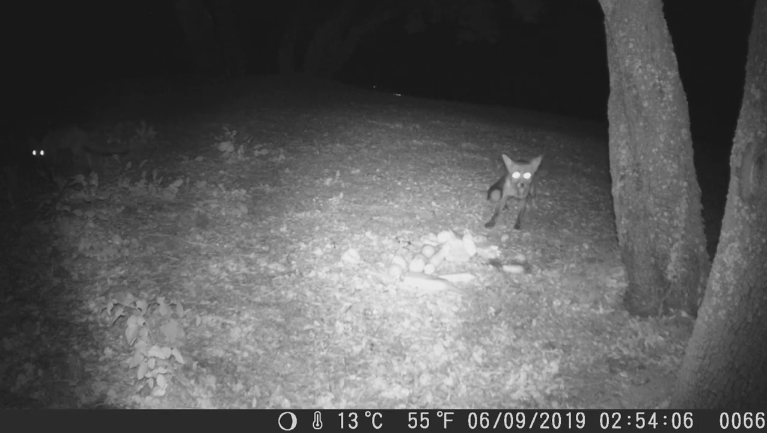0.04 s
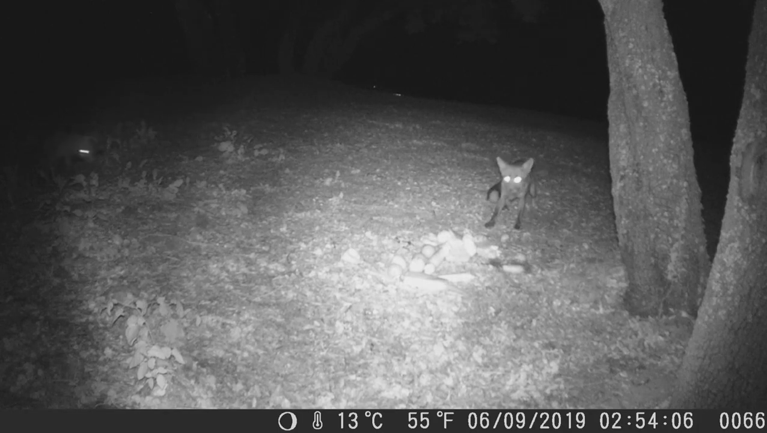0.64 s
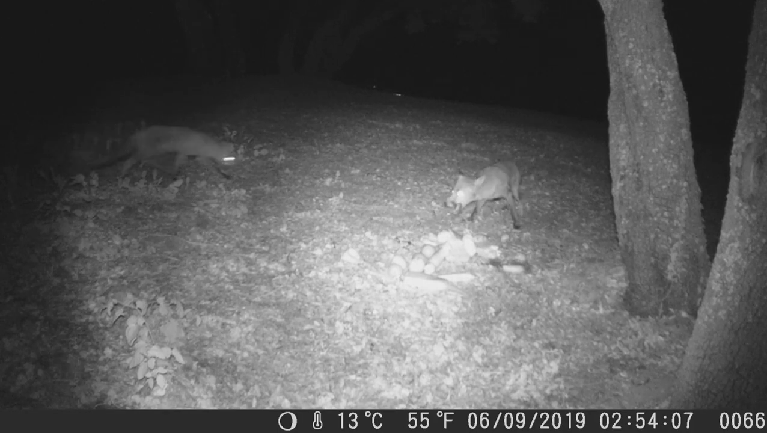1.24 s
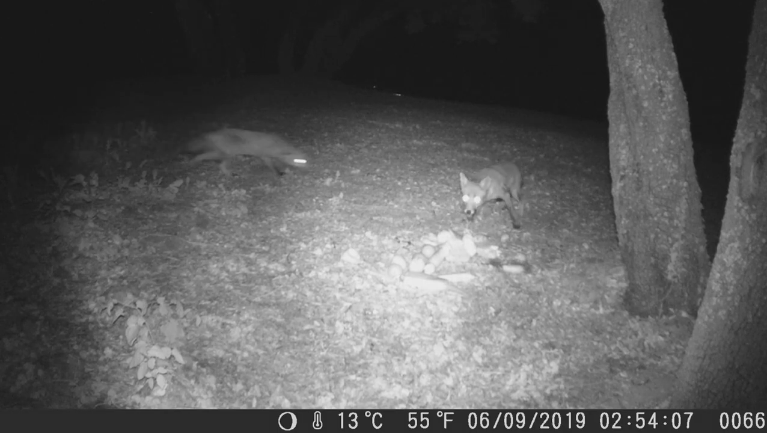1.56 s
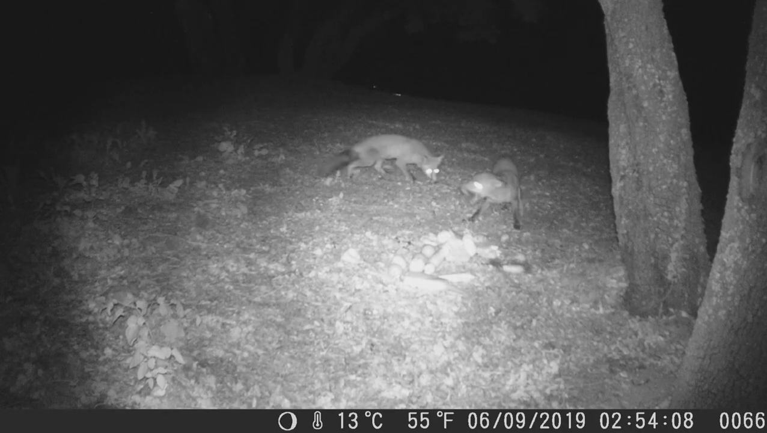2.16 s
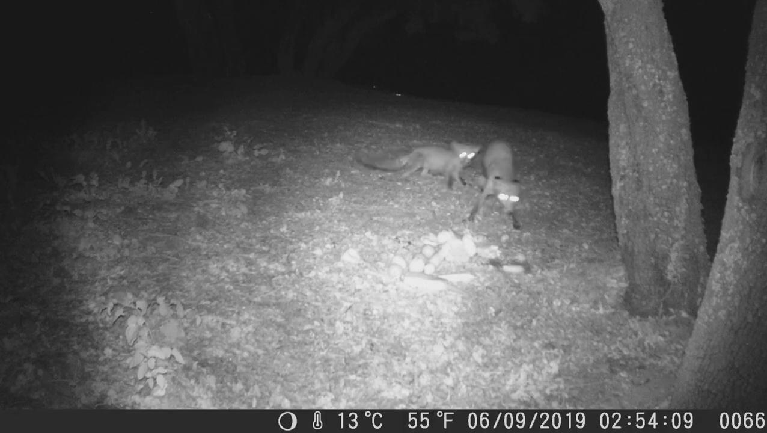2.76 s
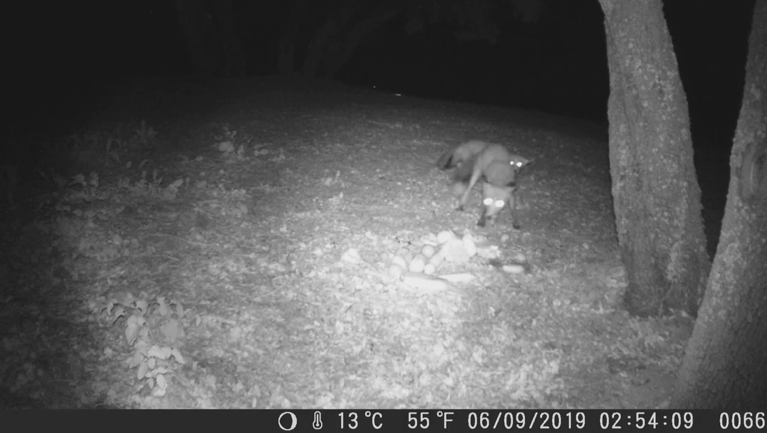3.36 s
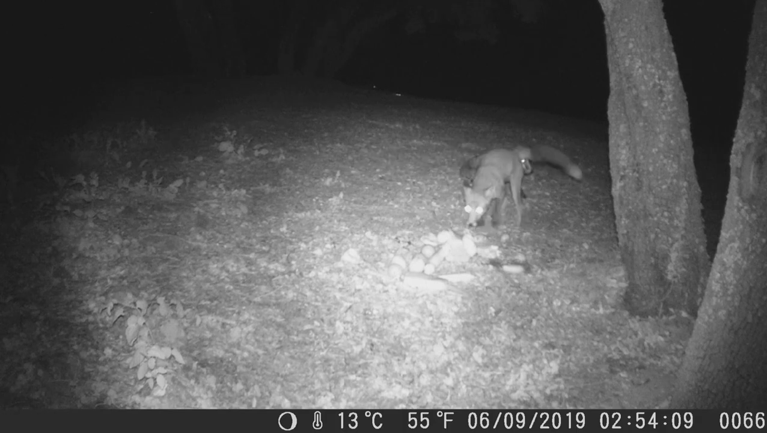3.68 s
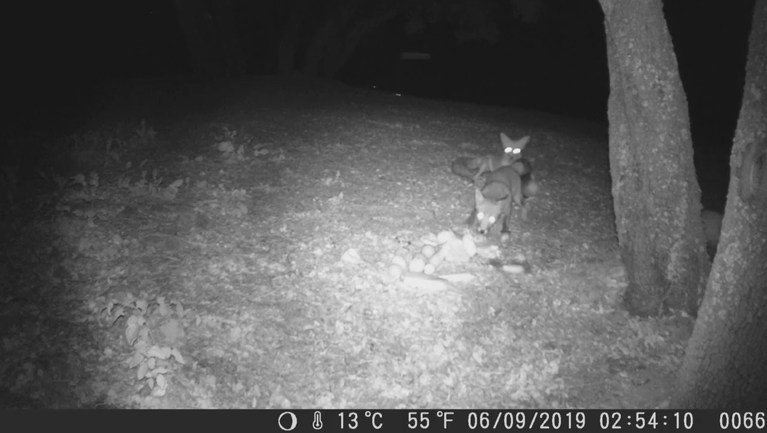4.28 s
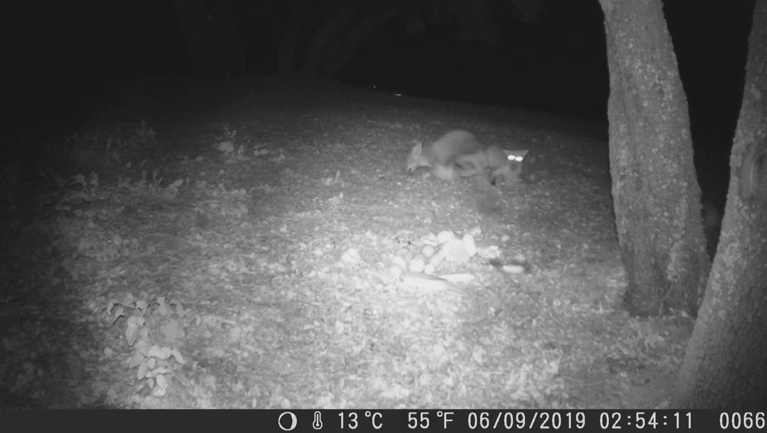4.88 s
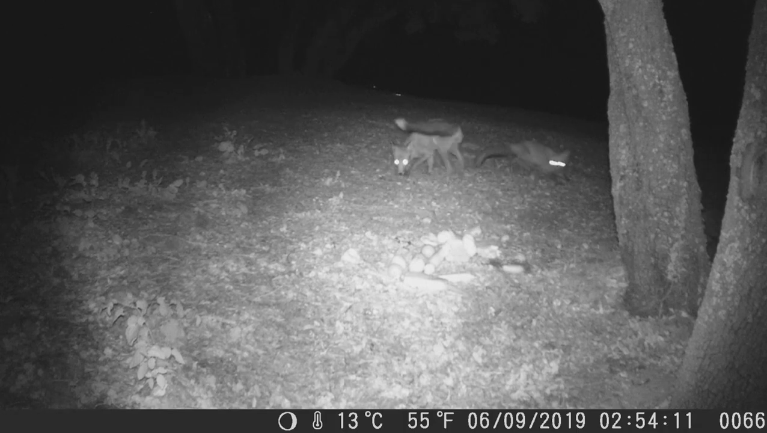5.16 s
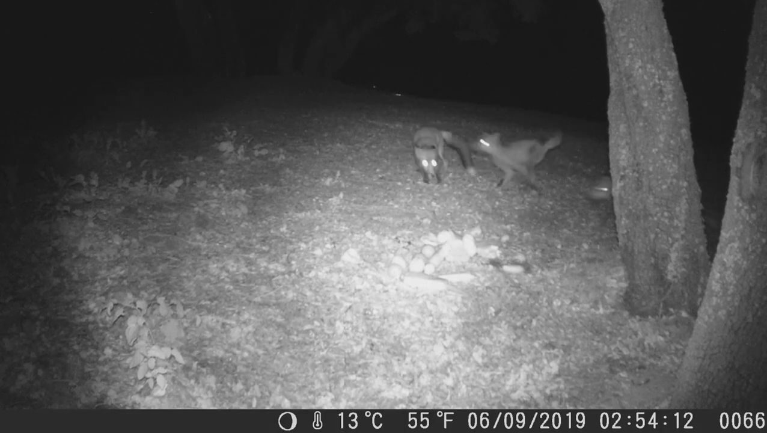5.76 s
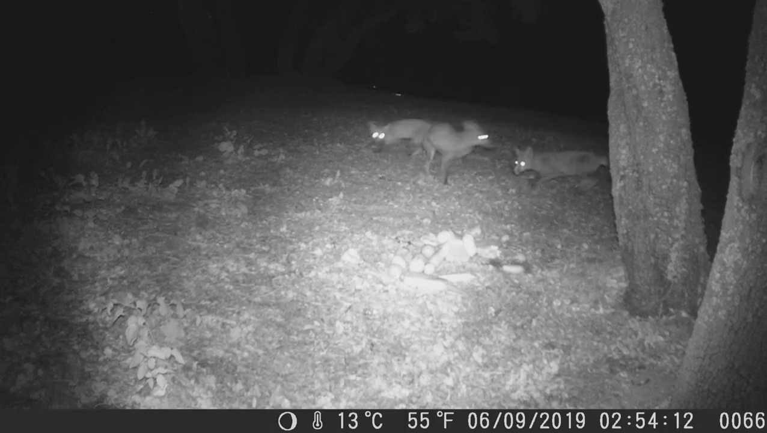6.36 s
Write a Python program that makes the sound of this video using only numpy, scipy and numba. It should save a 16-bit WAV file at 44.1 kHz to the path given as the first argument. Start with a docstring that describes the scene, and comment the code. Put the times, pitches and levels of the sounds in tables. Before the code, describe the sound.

Foxes squabble outdoors at night with short raspy cries, whines and yips over a steady low rumble and hiss.

```python
"""Foxes squabble on a lawn at night, a few metres from a trail camera.
Regular vibration of their vocal folds gives wavering whines, yips and a squeal; chaotic vibration
gives harsh rasps. Two dry clacks come first, and trees echo it all faintly.
Low buffets, thumps and a brief hum pass over the rumble and hiss of the night. The camera's housing
colours the cries and clacks; its electronics add a 25 Hz throb and a glassy mirrored treble."""
import sys
import numpy as np
from scipy import signal
from scipy.fft import rfft, irfft
from scipy.io import wavfile
from scipy.ndimage import uniform_filter1d
from numba import njit

SR = 44100
rng = np.random.default_rng(int(sys.argv[2]) if len(sys.argv) > 2 else 0)


def master(y):
    """Save y as 16-bit WAV."""
    cut = np.clip(np.atleast_2d(y).T, -1, 1)
    pcm = np.round(cut * 32767)  # scale
    wavfile.write(sys.argv[1], SR, pcm.astype(np.int16))


N = 291942
TIME = np.arange(N) / SR
FREQS = np.fft.rfftfreq(N, 1 / SR)


def undb(db):
    """Amplitude ratio of a level in decibels."""
    return 10 ** (np.asarray(db) / 20)


def unit(x):
    """Normalisation to an rms of 1."""
    return x / np.sqrt(np.mean(x ** 2))


def steady(x, size):
    """Division by the running rms over size samples levels the power and keeps the faster grain."""
    return x / np.sqrt(np.abs(uniform_filter1d(x ** 2, size=size)) + 1e-12)


def shape(x, gain):
    """Filtering as multiplication of the spectrum by a gain."""
    return irfft(rfft(x) * gain, N)


def below(hz, order=4):
    """Magnitude response of a maximally flat low-pass."""
    return 1 / np.sqrt(1 + (FREQS / hz) ** (2 * order))


def above(hz, order=4):
    """Magnitude response of the power-complementary high-pass."""
    return np.sqrt(1 - below(hz, order=order) ** 2)


def waver(hz):
    """Random modulation: noise low-passed at hz, with an rms of 1."""
    return unit(shape(rng.standard_normal(N), below(hz, order=3)))


@njit
def resonate(x, hz, width):
    """A second-order resonator whose centre frequency may move every sample."""
    y, band_state, low_state = np.empty(len(x)), 0., 0.
    for i in range(len(x)):
        tuning, damping = np.tan(np.pi * hz[i] / SR), width / hz[i]
        band = (band_state + tuning * (x[i] - low_state)) / (1 + tuning * (tuning + damping))
        band_state = 2 * band - band_state
        low_state += 2 * tuning * band
        y[i] = damping * band
    return y


def note(start, length, attack, release):
    """Time window of a sound: its samples, its progress from 0 to 1 and its amplitude envelope."""
    span = (TIME >= start) & (TIME <= start + length)
    age = TIME[span] - start
    ramp = lambda x: np.sin(np.pi / 2 * np.clip(x, 0, 1))
    return span, age / length, ramp(age / attack) * ramp((length - age) / release)


def arc(u, first, middle, last):
    """Parabolic interpolation through three values as u goes from 0 to 1."""
    return first + (last - first) * u + (middle - (first + last) / 2) * (1 - (2 * u - 1) ** 2)


def night(level_db=-53, swell_db=1.6):
    """Coloured noise: a smooth hiss over a rumble under slow amplitude modulation."""
    # Each row: frequency in Hz, relative spectral density in dB.
    spectrum = [(8, 8), (30, 1), (55, -7.5), (120, -10), (200, -16.5), (320, -24.5), (600, -31),
                (1400, -35), (2600, -42), (3300, -46), (5200, -52), (7800, -48.5), (11000, -59),
                (15500, -60.5)]
    hz, db = np.transpose(spectrum)
    colour = undb(np.interp(np.log(FREQS + 1), np.log(hz), db))
    noise = unit(shape(rng.standard_normal(N), colour)) * undb(level_db)
    rumble = shape(noise, below(370))
    return noise + rumble * (undb(swell_db * waver(0.72)) - 1)


def throb(rate_hz=25.002, first_s=0.0338, db=-53.5, width_s=0.003, uneven=0.18):
    """A periodic pulse train: the camera's electronics dip once for every picture taken."""
    offset_s = (((TIME - first_s) * rate_hz + .5) % 1 - .5) / rate_hz
    dips = -np.exp(-.5 * (offset_s / width_s) ** 2) * (1 + uneven * waver(5.6))
    return unit(dips - dips.mean()) * undb(db)


def mirrored(x, hold_hz=16000, second_hz=12000, second_db=-7):
    """Spectral imaging: coarse sample clocks mirror the sound about their rates, high notes most."""
    slope = np.gradient(shape(x, below(8060, order=6))) * SR / np.pi
    clock = lambda hz: np.sin(2 * np.pi * hz * TIME) / hz
    return x + slope * (clock(hold_hz) + undb(second_db) * clock(second_hz))


def buffets(width_hz=120, dull_hz=260):
    """Narrow-band noise under smooth envelopes is heard as soft low rushes."""
    # Each row: start, length, attack and release in seconds, level in dB before dulling, centre in Hz.
    rushes = [(0.218, 0.66, 0.45, 0.42, -55, 178), (1.77, .1, 0.053, 0.048, -53.5, 186),
              (3.255, 0.11, 0.039, 0.075, -50.5, 184.9), (5.819, 0.288, 0.096, 0.076, -48, 163),
              (6.063, 0.26, 0.11, .06, -61.5, 133)]
    noise, out = rng.standard_normal(N), np.zeros(N)
    for start, length, attack, release, db, hz in rushes:
        span, _, envelope = note(start, length, attack, release)
        band = steady(resonate(noise, np.full(N, float(hz)), width_hz), size=1200)
        out[span] += envelope * undb(db) * band[span]
    return shape(out, below(dull_hz, order=3) * above(59, order=3))


def hum(jitter=0.031):
    """Low gliding tones waver by random frequency modulation during the two longest buffets."""
    # Each row: start, length, attack and release in seconds, level in dB,
    # first, middle and last pitch in Hz.
    strains = [(.32, 0.325, 0.17, 0.32, -50, 154, 147, 159), (.6, 0.086, 0.033, 0.015, -55, 147, 187, 177),
               (.49, 0.13, 0.049, 0.15, -69, 370, 428, 410),
               (.635, 0.291, 0.016, 0.28, -52, 111.5, 133, 156),
               (5.86, 0.246, 0.018, 0.035, -52.5, 139.2, 142, 132)]
    drift, out = 1 + jitter * waver(27), np.zeros(N)
    for start, length, attack, release, db, *pitch in strains:
        span, progress, envelope = note(start, length, attack, release)
        phase = 2 * np.pi * np.cumsum(arc(progress, *pitch) * drift[span]) / SR
        out[span] += envelope * undb(db) * unit(np.sin(phase))
    return out


def thumps():
    """Wave packets: a few low cycles under a bell-shaped envelope make a dull bump with no click."""
    # Each row: peak time in seconds, peak level in dB, pitch in Hz, half length in seconds.
    packets = [(1.784, -42, 188, 0.006), (1.802, -35, 151, 0.0032), (1.815, -39, 129, 0.0068),
               (2.138, -42.5, 169, 0.0051), (3.31, -32.5, 123.5, 0.0063), (3.341, -43.5, 160, .004)]
    out = np.zeros(N)
    for peak_s, db, hz, half_length in packets:
        envelope = np.exp(-((TIME - peak_s) / half_length) ** 2)
        out += undb(db) * envelope * np.sin(2 * np.pi * (hz * (TIME - peak_s) + rng.random()))
    return out


def trees(x, wash_t60=0.41, wash_db=-23, near_t60=0.27, near_db=-15, echo_s=0.26, echo_db=-35):
    """Reverberation: quick scatter from ground and trunks, a dull thin wash and one far echo."""
    def tail(t60):
        return unit(rng.standard_normal(N) * undb(-60 * TIME / t60)) / np.sqrt(N)
    wash = undb(wash_db) * tail(wash_t60)
    echo = undb(echo_db) * np.roll(tail(0.186), int(echo_s * SR))
    response = shape(wash + echo, below(2600, order=3)) + undb(near_db) * tail(near_t60)
    return signal.fftconvolve(x, response[:SR])[:N]


def housing_colour(hz):
    """Gain at hz of the camera housing's fixed narrow resonances, which colour every cry and clack."""
    # Each row: centre in Hz, nominal width in Hz, relative peak gain in dB.
    resonances = [(816, 320, -11.5), (1080, 232, 15), (1422, 304, 9), (1819, 117, 3), (2319, 129, 0),
                  (2598, 340, -5), (3432, 190, -15), (4175, 590, -22.5), (5300, 1320, -24.5),
                  (6600, 1600, -28.5)]
    return np.sqrt(sum(undb(db) ** 2 / (1 + (1.3 * (hz - centre) / width) ** 2) ** 3
                       for centre, width, db in resonances))


def clacks(width_hz=650, lift_db=2, attack_s=0.0015):
    """Exponential decay: two dry bursts of noise, coloured by the housing, ring and die at once."""
    # Each row: time in seconds, level in dB before the lift, resonance in Hz, decay time in seconds.
    bursts = [(0.658, -56, 1900, 0.0067), (0.688, -55, 1700, 0.004)]
    out = np.zeros(N)
    for start, db, hz, decay in bursts:
        noise = shape(rng.standard_normal(N), housing_colour(FREQS))
        ring = steady(resonate(noise, np.full(N, float(hz)), width_hz), size=300)
        onset = np.sin(np.pi / 2 * np.clip((TIME - start) / attack_s + .5, 0, 1)) ** 2
        out += ring * undb(db + lift_db) * onset * np.exp(-np.maximum(TIME - start, 0) / decay)
    return out


def jaws(harsh_db_per_octave=27.5):
    """A variable cavity: as the jaws close, the mouth resonance sinks and a rasp's harsh top fades."""
    # Each row: start, length, attack and release in seconds, first and last body level in dB,
    # level of the top at the widest opening in dB, first, middle and last mouth resonance in Hz.
    gestures = [ (1.641, 0.068, 0.0089, .045, -49, -59.5, -66, 1360, 1300, 1142),
                (1.676, .165, 0.044, .02, -54, -49, -62.5, 990, 1370, 1300),
                (2.33, 0.069, 0.014, 0.035, -61.5, -64, -54, 1300, 1470, 1888),
                (2.425, 0.1, 0.025, .02, -69, -58, -52.5, 1860, 1790, 1662),
                (2.504, .097, 0.028, .015, -45, -43.5, -39, 1480, 1650, 1758),
                (2.586, 0.083, 0.013, .045, -41.5, -45.5, -43, 1910, 1560, 1183),
                (3.187, .185, .018, .055, -49.5, -51, -62.5, 1166, 1360, 1181),
                (3.329, 0.11, 0.061, 0.021, -48.5, -48, -63, 1210, 1140, 1080),
                (3.917, 0.12, 0.0073, 0.032, -55, -48.5, -51, 1510, 1650, 1438),
                (4.013, 0.1, 0.02, 0.049, -44.5, -51.5, -59, 1350, 1260, 1191),
                (4.117, .034, 0.005, 0.032, -54, -52.5, -66.5, 1290, 1170, 1146),
                (5.468, 0.035, 0.0048, 0.01, -55.5, -52.5, -56, 1460, 1330, 1080),
                (5.646, 0.11, .03, 0.061, -74, -71.5, -77, 1300, 1520, 1298),
                (5.669, .014, .003, .009, -65.5, -61.5, -66.5, 1450, 1400, 1420),
                (5.848, 0.07, 0.036, 0.025, -53.5, -62, -71, 1280, 1070, 1121),
                (5.9, .2, 0.021, 0.078, -63.5, -71.5, -73.5, 1300, 980, 1247)]
    body_power, top_power, weighted_hz = np.full(N, 1e-14), np.full(N, 1e-14), np.full(N, 1e-11)
    for start, length, attack, release, first_db, last_db, harsh_db, *mouth in gestures:
        span, progress, envelope = note(start, length, attack, release)
        hz = arc(progress, *mouth)
        power = (envelope * undb(first_db + (last_db - first_db) * progress)) ** 2
        body_power[span] += power
        weighted_hz[span] += power * hz
        top_db = harsh_db + harsh_db_per_octave * np.log2(hz / hz.max())
        top_power[span] += (envelope * undb(top_db)) ** 2
    return weighted_hz / body_power, 10 * np.log10(body_power), 10 * np.log10(top_power)


def rasps(mouth_width_hz=660, split_hz=2080, shrill_hz=3350., shrill_width_hz=500, gust_hz=850):
    """Chaotic vocal folds: uneven pulses and puffs of air excite the mouth and housing resonances."""
    mouth_hz, body_db, harsh_db = jaws()
    # the folds flap at half the mouth resonance, most wildly in a scream and as the voice gives out
    chaos = np.interp(harsh_db, [-84, -76, -52, -44], [1, 0, 0, 1])
    scream = np.interp(harsh_db, [-53, -46], [0, 1])
    jitter, air = .055 + .07 * chaos, .55 + .7 * chaos
    rattle = undb(2.7 * waver(330))
    cycles = np.cumsum(mouth_hz / 2 * (1 + jitter * waver(300))) / SR
    pulses = unit(np.diff(np.floor(cycles), prepend=0))
    puffs = unit(rng.standard_normal(N) * np.exp(-(cycles % 1) / 1.4))
    source = shape((pulses + air * puffs) * rattle, housing_colour(FREQS))
    body = resonate(shape(source, below(split_hz, order=8)), mouth_hz, mouth_width_hz)
    # a scream thins out at the low end
    body -= scream * shape(body, below(1050, order=5))
    top = shape(source, above(split_hz, order=12))
    # wide-open jaws add a shrill ring
    top += 2.1 * scream * resonate(top, np.full(N, shrill_hz), shrill_width_hz)
    # a dull gust of air goes with every rasp, less so with a tight scream
    gust = unit(shape(rng.standard_normal(N), below(gust_hz, order=6) * above(230)))
    gust *= undb(-24) * (1 - 0.28 * scream)
    return (steady(body, size=1300) + gust) * undb(body_db) + steady(top, size=1300) * undb(harsh_db)


def cries(whine_release_s=0.006, whine_db_per_octave=10.5):
    """Pitch and amplitude contours: each clear cry as samples, pitch, effort, brightness and jitter."""
    # Each row is one whine (the fourth a squeal), in points of time in seconds and pitch in Hz.
    contours = [
        [(1.352, 726), (1.386, 835), (1.406, 613), (1.42, 587), (1.458, 681), (1.476, 617.0), (1.496, 666),
         (1.552, 671), (1.586, 612.2), (1.648, 746)],
        [(2.112, 557), (2.174, 577), (2.192, 653), (2.242, 726)],
        [(2.238, 760.5), (2.246, 845), (2.258, 893), (2.28, 819), (2.332, 1050), (2.34, 1130)],
        [(2.372, 2028), (2.404, 1956), (2.454, 2160), (2.508, 2122), (2.515, 2086)],
        [(3.058, 830), (3.088, 620.7), (3.146, 684.3), (3.172, 666), (3.188, 563), (3.198, 606.7)],
        [(3.797, 743.4), (3.835, 959), (3.853, 834), (3.871, 819), (3.893, 970), (3.924, 1114)],
    ]
    # Each row: attack in seconds, first and last level at the mean pitch in dB,
    # first and last brightness in dB per octave, jitter as a share of the pitch.
    dynamics = [(0.032, -62, -57, 8, 2.5, 0.0097), (.02, -65, -72, -3, -6, .007),
                (.012, -58, -54.5, 17, 16, .007), (.006, -55.5, -41.5, 23, -5, 0.0073),
                (0.032, -58.5, -55, 1, 1.5, 0.0082), (0.025, -64, -55.5, 14, 11.5, 0.0056)]
    # Each row: start, length, attack and release in seconds, level in dB, brightness in dB per octave,
    # jitter as a share of the pitch, first, middle and last pitch in Hz.
    yips = [ (1.827, 0.036, 0.01, 0.027, -55, -6, 0.017, 1120, 1010, 980),
            (2.338, 0.039, .005, 0.0053, -49.5, 14.5, 0.036, 1520, 1700, 1920),
            (2.592, 0.028, 0.0054, 0.0064, -34.5, -21, .012, 1900, 1770, 1630),
            (2.619, 0.017, .008, 0.0089, -32.5, -2, .012, 1495, 1480, 1420),
            (2.642, .033, 0.011, 0.0089, -56.5, -4, 0.022, 1100, 980, 960),
            (4.399, 0.059, 0.039, 0.028, -63.5, -1, 0.027, 1200, 1070, 980),
            (5.414, 0.025, 0.008, 0.014, -49.5, 9.5, 0.011, 1400, 1430, 1510),
            (5.431, .052, 0.0049, 0.017, -57.5, 13.5, 0.018, 1510, 1585, 1530),
            (5.817, 0.038, .018, 0.0059, -62.5, 7, .015, 1050, 830, 994),
            (5.853, 0.055, .01, 0.04, -47.5, 0, .012, 1440, 1390, 1287)]
    for contour, (attack, first_db, last_db, first_tilt, last_tilt, jitter) in zip(contours, dynamics):
        times, pitch = np.transpose(contour)
        span, progress, envelope = note(times[0], times[-1] - times[0], attack, whine_release_s)
        hz = uniform_filter1d(np.interp(TIME[span], times, pitch), size=300)
        db = first_db + (last_db - first_db) * progress + whine_db_per_octave * np.log2(hz / hz.mean())
        yield span, hz, envelope * undb(db), first_tilt + (last_tilt - first_tilt) * progress, jitter
    for start, length, attack, release, db, tilt, jitter, *pitch in yips:
        span, progress, envelope = note(start, length, attack, release)
        yield span, arc(progress, *pitch), envelope * undb(db), tilt, jitter


def whines_and_yips(shimmer=0.25, air_db=-19, air_db_per_octave=3, ring_db=6, edge_hz=4600):
    """Periodic vocal folds: harmonics slide through the housing's resonances, with a little air."""
    voice, leak = np.zeros(N), np.zeros(N)
    wobble, flutter = waver(170), waver(75)
    harmonic = np.arange(1, 13)[:, None]
    for span, pitch, effort, tilt, jitter in cries():
        hz = pitch * (1 + jitter * wobble[span])
        phase = 2 * np.pi * np.cumsum(hz) / SR
        # brightness tilts the overtones, but the folds close too softly to sound far above the edge
        octaves = np.log2(np.minimum(np.minimum(harmonic, 3.2), 4300 / hz))
        weights = housing_colour(harmonic * hz) * undb(tilt * octaves)
        weights *= undb(np.interp(harmonic * hz / edge_hz, [1, 1.3], [0, -17]))
        # low, pinched whines have a thin ring in their fifth and sixth harmonics
        weights *= undb(ring_db * np.isin(harmonic, (5, 6)) * np.interp(hz, [700, 900], [1, .3]))
        weights /= np.sqrt(np.sum(weights ** 2, axis=0) / 2)
        tone = np.sum(weights * np.sin(harmonic * phase), axis=0)
        voice[span] += effort * tone * (1 + shimmer * flutter[span])
        # higher, tighter cries leak more air each time the folds open
        leak[span] += effort * undb(air_db + air_db_per_octave * np.log2(hz / 700)) * (1 + np.cos(phase))
    air_colour = unit(housing_colour(FREQS) ** 0.54 * above(1360, order=8))
    return voice + shape(leak * rng.standard_normal(N), air_colour)


def scene():
    """Superposition of the foxes, their echo, the low sounds and the night air."""
    foxes = whines_and_yips() + rasps() + clacks()
    return (foxes + trees(foxes) + buffets() + hum() + thumps() + night())[None]


def record(dry, top_hz=15700):
    """Band limiting: the camera adds its throb and mirrored treble, then cuts the top steeply."""
    return shape(mirrored(dry[0] + throb()), below(top_hz, order=120))[None]


dry = scene()
out = record(dry)
master(out)
```